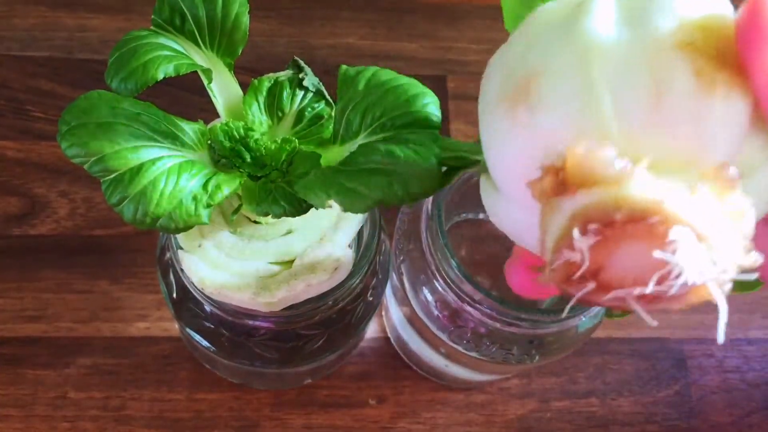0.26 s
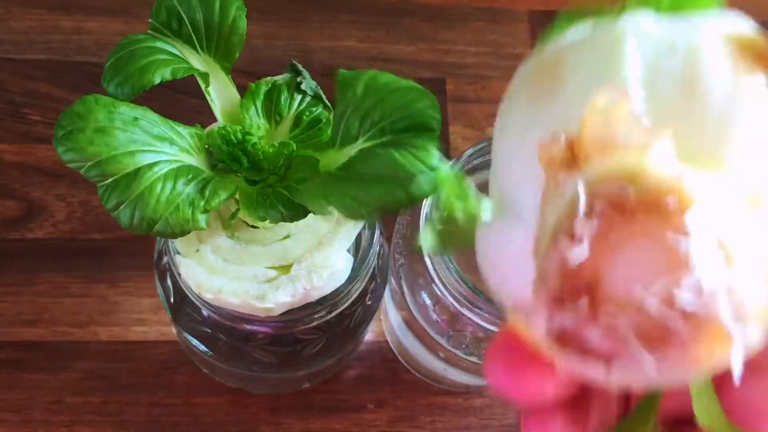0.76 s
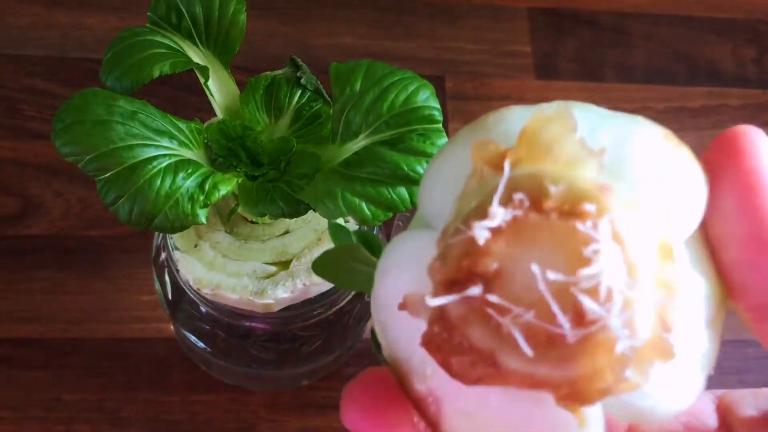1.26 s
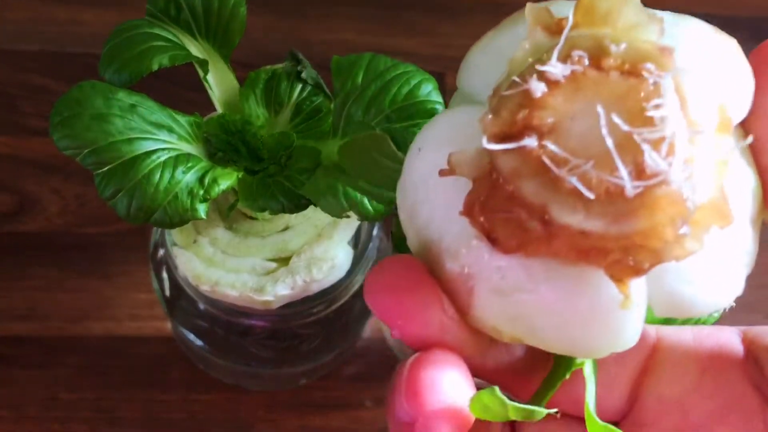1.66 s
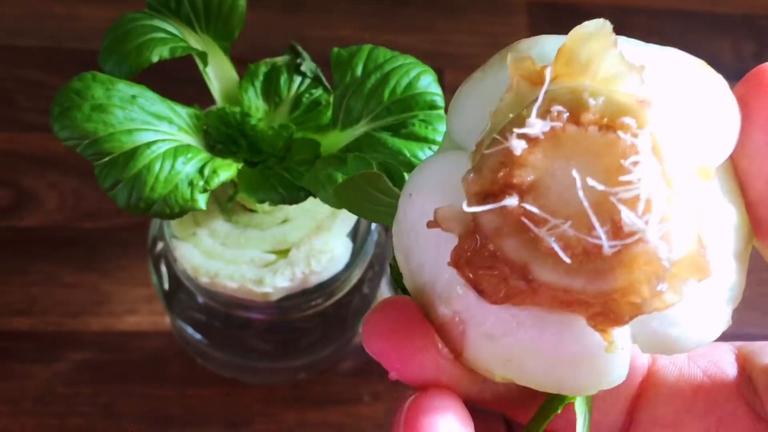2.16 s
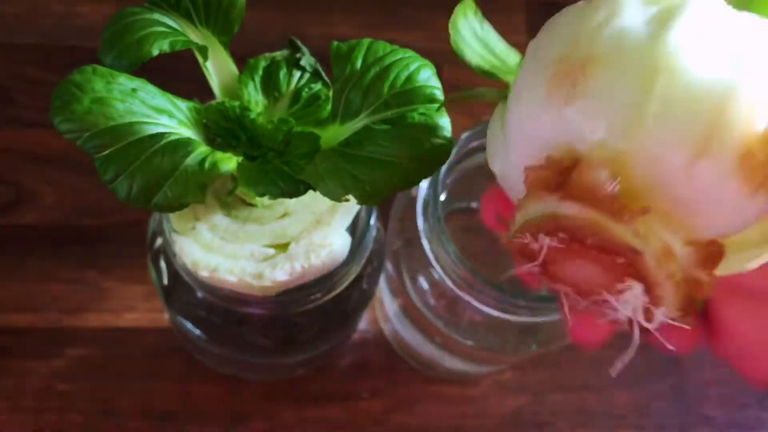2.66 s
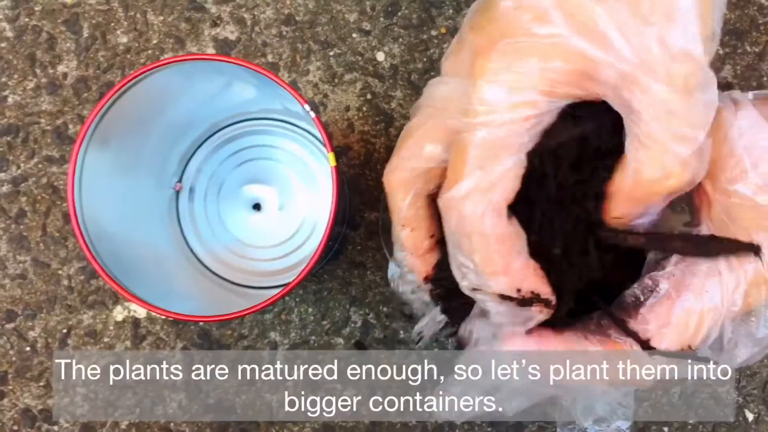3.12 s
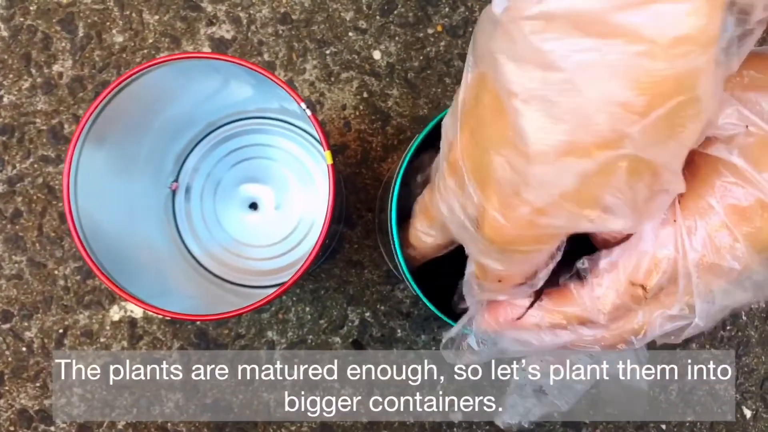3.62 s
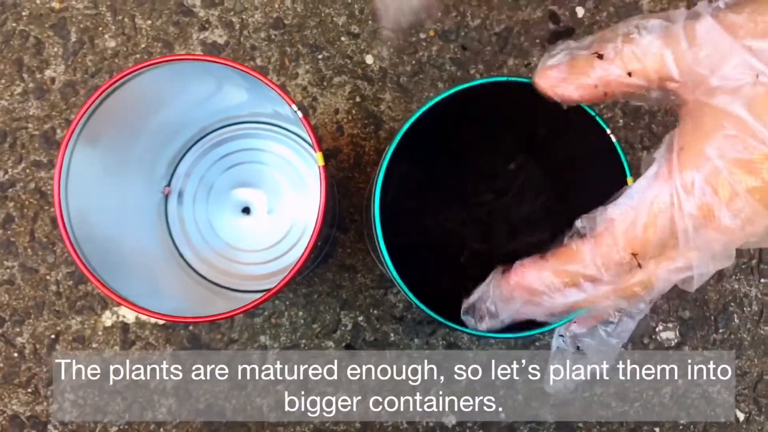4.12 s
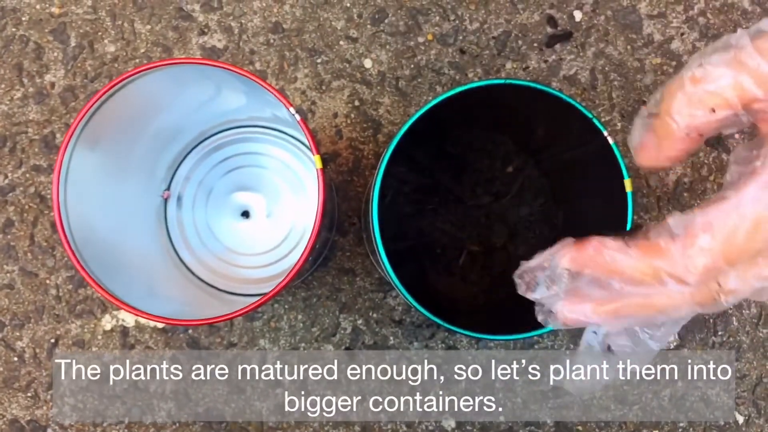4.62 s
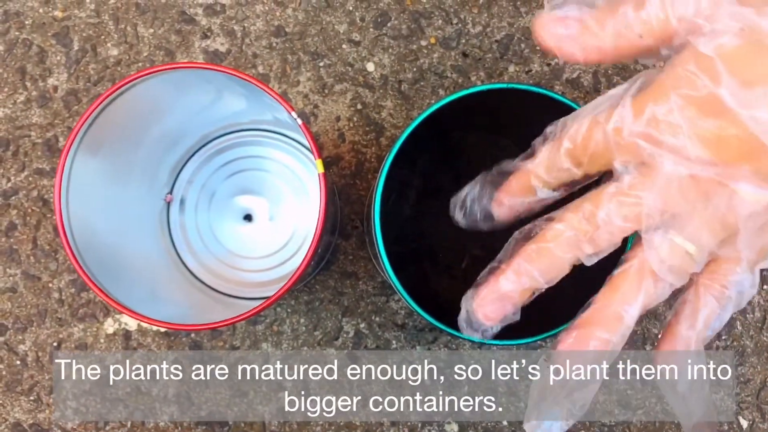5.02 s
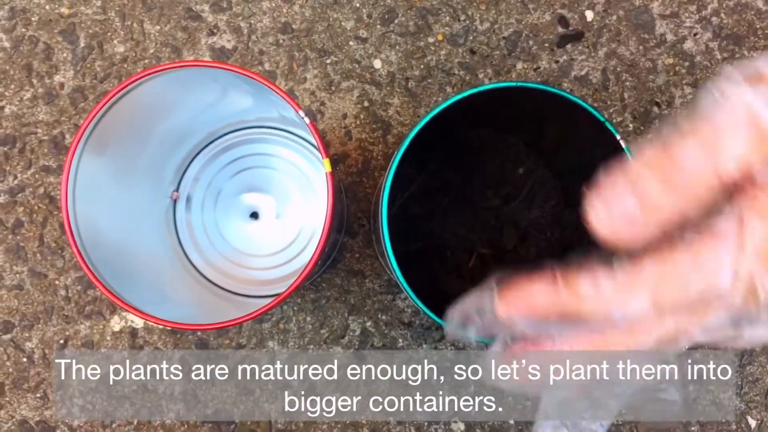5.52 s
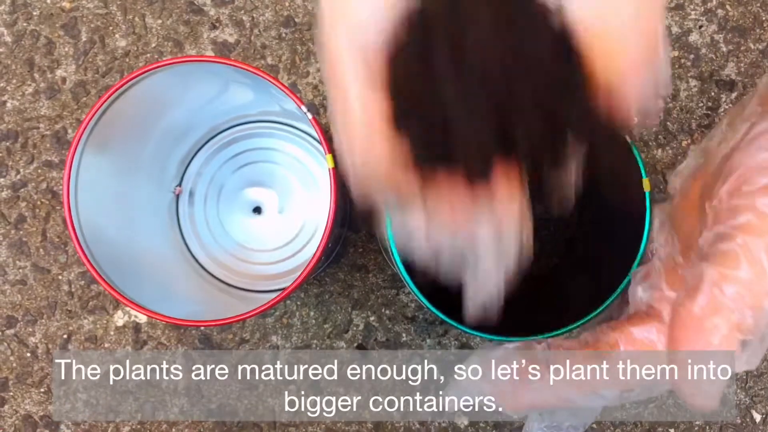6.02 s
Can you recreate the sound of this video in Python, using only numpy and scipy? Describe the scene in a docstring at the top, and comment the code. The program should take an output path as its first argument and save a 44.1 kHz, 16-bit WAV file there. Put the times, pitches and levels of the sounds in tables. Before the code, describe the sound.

A very quiet room with faint hiss and low wavering hum; small wet leaf crackles come in three clusters, then near silence and a faint knock. Abruptly outdoors, soil drops into a metal tin with a loud, quickly choked clang. Close thin plastic gloves crinkle and snap while fingers rake and pat the soil over distant traffic rumble. Near the end small hard scraps chink brightly.

```python
"""A quiet room comes first, with filtered-noise hiss and a wavering sine hum; a vegetable is turned by hand,
and its wet leaves crackle as noise bursts that excite rib resonances, until a faint low knock made likewise.
Then, outdoors on stone, filtered noise gives far traffic, and a handful of soil drops into a tin: decaying
modes ring until the soil damps them. Thin gloves crinkle and snap as bursts of noise, and fingers rake the soil
(grains in moving bands) and pat it (short falling modes). Near the end two hard scraps chink: high modes."""
import sys
import numpy as np
from scipy import signal
from scipy.fft import rfft, irfft
from scipy.io import wavfile
from scipy.ndimage import uniform_filter1d

SR = 44100
rng = np.random.default_rng(int(sys.argv[2]) if len(sys.argv) > 2 else 0)


def ratio(d):
    """dB to gain"""
    e = np.asarray(d, float) / 20
    return 10 ** e


def int16_out(signal):
    """Quantize to a 16-bit WAV file."""
    q = np.round(np.clip(np.atleast_2d(signal).T, -1, 1) * 32767)
    wavfile.write(sys.argv[1], SR, q.astype(np.int16))


N = 276948
T = np.arange(N) / SR  # time [s]

# Spectra of the room hiss and the yard rumble, relative: f/Hz, level/dB
ROOM_SPECTRUM = [(15, -36), (25, -5), (80, -8), (99, -8.5), (249, -19), (285, -18), (545, -28), (624, -24),
                 (840, -26), (1040, -24), (1290, -27), (6560, -35.5), (16000, -41)]
YARD_SPECTRUM = [(25, -13), (60, 2), (170, -2.5), (320, -21.5), (700, -25.5), (1500, -30.5), (4000, -66),
                 (9000, -30.5), (16000, -66.5)]
# Hum and the rush of a far vehicle in the room: t/s, hum f/Hz, hum level/dB, rush level/dB
HUM_COURSE = [(0.0, 80.2, -78.5, -93), (0.11, 68.7, -94, -88), (0.34, 70.3, -57.5, -91),
              (0.48, 67.9, -92, -97), (0.94, 75.4, -69, -77), (1.82, 78.2, -71, -93),
              (1.9, 76.4, -61.5, -78.5), (2.57, 77.3, -57, -67.5), (2.8, 75, -82, -70)]
# Leaf crackles, and last a faint low knock: t/s, peak level/dB, centre f/Hz, decay t60/s
CRACKLES_AND_KNOCK = [(0.24, -50, 3330, 0.047), (0.257, -50, 1960, 0.05), (0.278, -40, 2440, 0.041),
                      (0.31, -48, 2660, .033), (0.324, -39, 2400, 0.064), (0.329, -40.5, 3620, 0.049),
                      (0.347, -38.5, 3360, 0.028), (0.49, -56.5, 2760, 0.015), (0.554, -34.5, 1640, 0.063),
                      (0.572, -36.5, 2700, .023), (0.579, -34, 2620, 0.021), (0.591, -42, 1390, 0.023),
                      (0.727, -57, 2920, .024), (0.819, -35, 2640, 0.01), (0.834, -33, 1810, 0.05),
                      (0.861, -31, 2700, 0.027), (0.868, -36, 1500, .03), (1.169, -57, 2950, 0.017),
                      (2.729, -52.5, 582, 0.036)]
# Resonances of the stiff leaf ribs: f/Hz, nominal width/Hz, level/dB
LEAF_RIBS = [(1270, 200, -1), (1750, 250, -1), (2440, 220, 1), (3400, 250, -2), (3900, 300, -2),
             (4480, 250, -2), (6300, 600, -6)]
# Chinks on the stone: t/s, peak level/dB, index of the scrap
SCRAP_CHINKS = [(5.927, -38.5, 0), (5.9947, -30, 1), (6.046, -38, 1), (6.106, -43, 0)]
# Modes of the two small hard scraps, one list each: f/Hz, level/dB, t60/s
SCRAP_MODES = ([(4823, 0, .087), (5626, -3, .15), (6659, -6, .12), (6988, -12, .12), (8096, -2, .068),
               (12970, -12, .061), (13400, -8, .056)], [(2900, -16, .06), (3343, -10, .1), (3887, -5, .09),
               (4300, -10, .07), (5626, -12, .1), (4683, -1, .05), (6900, -6, .1), (8091, -4, .068),
               (8678, -4, .12), (9437, -14, .15), (9981, -13, .15), (11220, -14, .12), (12200, 0, .036),
               (14320, -9, .05), (15340, -4, .08)])
# Glove snaps: t/s, peak level/dB, centre f/Hz, decay t60/s
GLOVE_SNAPS = [(3.2297, -26, 3530, 0.012), (3.2585, -30.5, 4600, 0.016), (3.2902, -23, 4650, 0.018),
               (3.3592, -12, 8800, 0.025), (3.4416, -23.5, 6550, 0.023), (3.514, -25, 9090, 0.016),
               (3.5365, -29, 3360, 0.025), (3.566, -28.5, 5860, 0.016), (3.6296, -18, 4620, 0.038),
               (3.683, -28, 6490, 0.015), (3.7508, -24, 5760, 0.02), (3.803, -29.5, 5730, 0.015),
               (3.995, -32, 6500, 0.017), (4.1452, -32.5, 5800, 0.015), (4.232, -36, 9390, 0.012),
               (4.2467, -34, 6680, 0.015), (4.2874, -38.5, 8550, 0.021), (4.5987, -35, 6900, 0.011),
               (4.7752, -27.5, 8290, 0.013), (4.8281, -31.5, 5700, 0.018), (4.8556, -21, 8700, 0.0076),
               (4.9514, -30, 4000, 0.016), (4.999, -33, 5800, 0.016), (5.186, -23.5, 6860, 0.017),
               (5.2317, -24.5, 8700, 0.016), (5.308, -30.5, 6840, 0.013), (5.44, -30, 4170, 0.016),
               (5.4768, -39, 6050, 0.016), (5.54, -36, 4480, 0.021), (5.558, -30, 8560, 0.014),
               (5.5909, -36, 8600, 0.013), (5.6373, -43, 6330, 0.016), (5.6546, -29.5, 8350, 0.015),
               (5.7141, -31, 9300, 0.016), (5.8797, -38, 8820, 0.02), (5.926, -55.5, 4870, 0.016),
               (5.9948, -33, 8500, 0.016), (6.187, -56.5, 12900, 0.016), (6.203, -38, 9250, 0.015),
               (6.2584, -28, 13200, 0.016)]
# Hands at work: t/s, glove crinkle level/dB, soil rustle level/dB
HAND_LEVELS = [(2.94, -47, -39), (2.99, -47.5, -38.5), (3.09, -47.5, -53.5), (3.12, -50, -38.5),
               (3.25, -41.5, -48.5), (3.38, -43, -46.5), (3.6, -46.5, -55.5), (3.72, -43.5, -50),
               (3.88, -45, -54.5), (3.94, -50, -51.5), (4.08, -47.5, -58), (4.15, -55, -72),
               (4.32, -60, -75), (4.37, -51, -62.5), (4.56, -59.5, -70.5), (4.62, -57, -57.5),
               (4.7, -52, -54.5), (4.78, -50, -54.5), (4.88, -44.5, -53), (5.08, -52.5, -53.5),
               (5.19, -44.5, -51.5), (5.33, -49.5, -64), (5.38, -44, -54), (5.5, -55.5, -57),
               (5.62, -58, -63.5), (5.72, -47.5, -60), (5.82, -62.5, -66), (5.96, -56.5, -71),
               (6.1, -58.5, -77), (6.28, -50, -48)]
# Spectra of glove film and raked soil, relative: f/Hz, level/dB
GLOVE_SPECTRUM = [(900, -40), (1600, 3.5), (3000, 2), (4500, 5), (7000, 2), (9500, 0), (13000, -0.5),
                  (16000, -1)]
SOIL_SPECTRUM = [(500, -25), (900, -6), (1400, -1), (2200, -2), (3600, -6), (5200, -14), (8000, -30)]
# Pitch centre about which the rustle drifts: t/s, f/Hz
RAKE_PITCH = [(2.94, 2000), (4.5, 2200), (4.57, 1250), (4.76, 1900), (6.28, 2200)]
# Finger pats: t/s, peak level/dB, pitch as a multiple of the usual
FINGER_PATS = [(3.422, -29, 1.18), (3.715, -17, 1.086), (3.9034, -20.5, .95)]
# Modes of the filled tin at the onset of a pat of usual pitch: f/Hz, level/dB, t60/s
FILLED_TIN_MODES = [(397, -10.5, 0.019), (575, -12, 0.067), (1134, 5, 0.012), (1500, 3.5, .014),
                    (1990, 0, 0.0098), (2400, -14, 0.019)]
# Mode frequencies of the tin: f/Hz
TIN_MODE_HZ = [340, 400, 480, 603, 760, 935, 986, 1038, 1125, 1205, 1255, 1480, 1640, 1865, 1985, 2128,
               2264, 2338, 2451, 2643, 2937, 3354, 3492, 4150, 4343, 4890, 5110, 6100, 7050, 8280]
# Response of each of those modes: level/dB, t60/s when empty
TIN_MODES = [(5, 0.16), (-3, 0.22), (-3.5, 0.04), (-8, 0.22), (0.5, 0.023), (-21.5, 0.25), (0, 0.039),
             (-10, 0.14), (-17, 0.34), (-12.5, 0.17), (-7.5, 0.05), (-20, 0.024), (-13, 0.048),
             (3.5, 0.093), (-9, 0.064), (-26, 0.36), (-34.5, 0.17), (1.5, 0.12), (-4.5, 0.056), (-41, 0.48),
             (-6.5, 0.071), (-8, 0.22), (-14, 0.176), (-0.5, 0.034), (-8, 0.13), (-6.5, 0.14), (-3, 0.07),
             (-8, 0.079), (-3, 0.018), (-6, 0.069)]
# Choking of the tin by soil and hands: t/s, damping as a multiple of the empty tin's
TIN_CHOKE = [(2.8, 1.1), (2.89, 1.2), (2.925, 1.8), (2.94, 5), (3.1, 5), (3.125, 1.7), (3.22, 1.7),
             (3.3, 6), (6.28, 9)]
# Blows on the tin: t/s, peak level/dB of the ring, centre f/Hz of the modes reached, spread/octaves,
# level/dB of the grit hiss against the ring
TIN_BLOWS = [(2.814, -10.5, 1790, 1.14, -16), (2.82, -15, 2100, 1.3, -8), (2.824, -3.5, 2020, 1.18, -15),
             (2.838, -28.5, 2000, 1.2, -5), (2.853, -16.5, 1940, 1.46, -19), (2.8932, -13, 1876, 1.47, -16),
             (2.908, -2, 2190, 0.58, -14.5), (2.91, -17, 328, 0.33, -20.5), (2.912, -4.5, 2450, 0.58, -45),
             (2.925, -10, 2420, 1.8, -10), (2.927, -17, 360, 0.98, -27), (2.991, -17.5, 2440, 1.05, -7.5),
             (3.041, -27.5, 3650, 0.62, -18), (3.07, -41, 3520, .2, -25), (3.122, -33, 1125, .035, -20),
             (3.128, -27, 2400, 0.62, -7), (3.136, -24.5, 336, 1.6, -8), (3.165, -34, 1125, .035, -23),
             (3.145, -32, 2400, 0.68, -4.5), (3.267, -39, 345, 1.3, -2.5), (3.307, -32, 1890, 0.54, -9.5),
             (3.519, -40.5, 1270, 0.085, -20), (4.008, -35, 310, 1.8, -17), (4.071, -39, 1100, 0.39, -19),
             (4.576, -44, 1280, 0.11, -25.5), (4.997, -44.5, 302.6, 0.76, -5.5),
             (5.32, -42.5, 342, 1.8, -5), (5.36, -38.5, 2110, 0.58, 1.5), (5.946, -43.5, 371, 0.98, -12)]
# Microphone response: f/Hz, level/dB
MIC_RESPONSE = [(20, -30), (45, -1), (100, 0), (4300, 0), (4800, -3), (5400, 0), (9600, 0), (10350, -6),
                (11300, -1), (15000, 0)]


def curve(rows):
    """Linear interpolation: turns the columns of a timed table into signals."""
    s, *columns = np.transpose(rows)
    return [np.interp(T, s, c) for c in columns]


def colour(x, points):
    """Linear filtering: weights the spectrum by (f/Hz, level/dB) points and restores rms 1."""
    hz, db = np.transpose(points)
    f = np.arange(N // 2 + 1) * SR / N + 1
    gain = ratio(np.interp(np.log(f), np.log(hz), db))
    y = irfft(rfft(x) * gain, N)
    return y / y.std()


def band(x, hz, octaves):
    """Resonant selection: passes a band around a centre frequency."""
    low, high = hz * 2 ** (-octaves / 2), hz * 2 ** (octaves / 2)
    edges = low, min(high, SR / 2.2)
    return signal.sosfilt(signal.butter(2, edges, "band", fs=SR, output="sos"), x)


def walk(rate):
    """Random modulation: levels held for 1 / rate seconds and smoothed twice."""
    k = int(SR / rate)
    steps = np.repeat(rng.standard_normal(N // k + 1), k)
    return 3.3 * uniform_filter1d(uniform_filter1d(steps, k), k)[:N]


def add(out, s, sound):
    """Superposition: adds a sound at a given time."""
    i = int(s * SR)
    out[i:i + len(sound)] += sound[:N - i]


def decay(t, t60):
    """Exponential damping: amplitude falls by 60 dB in t60."""
    return np.exp(-np.log(1000) * t / t60)


def modes(rows, t, phase_s):
    """Modal superposition: damped sines of (f/Hz, level/dB, t60/s), whose phase runs on its own clock."""
    return sum(ratio(db) * decay(t, t60) * np.sin(2 * np.pi * hz * phase_s) for hz, db, t60 in rows)


def grains(rate, spread_db, tail_s, bunch_db, bed):
    """Granular noise: bunched impacts of very unequal size, over a bed of countless tiny ones."""
    sizes = ratio(spread_db * np.minimum(rng.exponential(size=N), 5))
    clicks = (rng.random(N) < rate / SR) * sizes
    burst = signal.lfilter([1], [1, -np.exp(-1 / (tail_s * SR))], clicks)
    return rng.standard_normal(N) * (burst / burst.mean() + bed) * ratio(bunch_db * walk(30))


def room():
    """Stationary noise and frequency modulation: even hiss, a wavering hum and a far rush that swells."""
    hum_hz, hum_db, rush_db = curve(HUM_COURSE)
    phase = 2 * np.pi * np.cumsum(hum_hz + 2.32 * walk(4.6)) / SR
    hum = np.sqrt(2) * np.sin(phase) * ratio(hum_db + 0.47 * walk(12))
    rush = band(rng.standard_normal(N), 590, 2.17)
    hiss = ratio(-65) * colour(rng.standard_normal(N), ROOM_SPECTRUM)
    return hiss + hum + rush / rush.std() * ratio(rush_db)


def yard():
    """Amplitude-modulated noise: distant traffic rumble that rolls up and down a little."""
    roll = ratio(1.1 * walk(4))
    return ratio(-52) * roll * colour(rng.standard_normal(N), YARD_SPECTRUM)


def leaves_and_knock():
    """Forced resonance: noise bursts ring resonances near their pitch; the harder, the broader."""
    out, t = np.zeros(N), T[:4096]
    # the resonances are never quite alike from one burst to the next
    bends = 2 ** (0.07 * rng.standard_normal((len(CRACKLES_AND_KNOCK), len(LEAF_RIBS))))
    noises = rng.standard_normal((len(CRACKLES_AND_KNOCK), 4096))
    for (s, peak_db, centre_hz, t60), noise, bend in zip(CRACKLES_AND_KNOCK, noises, bends):
        burst = noise * decay(t, max(t60, 0.002)) * (1 - np.exp(-t / 0.001)) ** 2
        ribs = 0
        for (hz, width, db), b in zip(LEAF_RIBS, bend):
            gain = ratio(db - 5 * np.log2(hz / centre_hz) ** 2) / np.sqrt(width)
            ribs = ribs + gain * band(burst, hz * b, width / hz * 1.8)
        broad = band(burst, 2000, 4.83)
        broad_gain = ratio(0.73 * (max(peak_db, -44) + 37.5))
        sound = ribs / ribs.std() + broad_gain * broad / broad.std()
        add(out, s, ratio(peak_db) * sound / np.abs(sound).max())
    return out


def chinks():
    """Free vibration: a sharp strike sets off the thin high modes of a hard scrap."""
    out, t = np.zeros(N), T[:6000]
    for s, peak_db, which in SCRAP_CHINKS:
        ring = modes(SCRAP_MODES[int(round(which))], t, t)
        add(out, s, ratio(peak_db) * ring / np.abs(ring).max())
    return out


def snaps():
    """Transient noise: each glove snap rises and decays quickly, with a favoured pitch region."""
    out, t = np.zeros(N), T[:4096]
    noises = rng.standard_normal((len(GLOVE_SNAPS), 4096))
    for (s, peak_db, hz, t60), noise in zip(GLOVE_SNAPS, noises):
        burst = noise * decay(t, max(t60, 0.002)) * (1 - np.exp(-t / 0.00023)) ** 2
        sound = band(burst, hz, 1.5)
        broad = band(burst, 6500, 6.37)
        sound = sound / sound.std() + ratio(-3.5) * broad / burst.std()
        add(out, s, ratio(peak_db) * sound / np.abs(sound).max())
    return out


def echoes(near):
    """Diffuse reflection: convolution with decaying noise gives quick echoes from nearby surfaces."""
    echo = rng.standard_normal(6000) * decay(T[:6000], 0.21)
    return ratio(-12) * signal.fftconvolve(near, echo / np.linalg.norm(echo))[:N]


def film(crinkle_db):
    """Buckling: creases pop in bunches, each with its own pitch region; busy hands blur them into a bed."""
    bunch_db = 1.3 * walk(45)
    sizes = ratio(0.85 * np.minimum(rng.exponential(size=N), 3.5) + bunch_db)
    pops = (rng.random(N) < 400 / SR) * sizes  # 400 pops per second on average
    out = 0
    for hz in 2000 * 2 ** np.arange(0, 3.2, 0.6):
        strengths = ratio(5 * rng.standard_normal(N))
        burst = signal.lfilter([1], [1, -np.exp(-1 / (0.0007 * SR))], pops * strengths)
        bed = 1.2 * ratio(0.5 * (crinkle_db + 48) + bunch_db + 1.5 * walk(25))
        noise = rng.standard_normal(N) * (burst / burst.mean() + bed)
        out = out + np.sqrt(hz) * band(noise, hz, 0.6)
    return out


def gloves(crinkle_db):
    """Tension and brightness: the crinkle's top octave is louder when the film is drawn tight."""
    sound = colour(film(crinkle_db), GLOVE_SPECTRUM)
    top = signal.sosfiltfilt(signal.butter(3, 10000, "high", fs=SR, output="sos"), sound)
    body = sound - top
    # the top gains 0.46 dB on the body per dB of crinkle
    bright_db = -2.5 + 0.46 * (crinkle_db + 53) + 1.1 * walk(2.2)
    return ratio(crinkle_db) * (body / body.std() + ratio(bright_db) * top / top.std())


def raked_soil(soil_db):
    """Granular friction: a rustle of grains is weighted, band by band, around a drifting pitch."""
    rake_hz = curve(RAKE_PITCH)[0] * 2 ** (0.074 * walk(3.9))
    rustle = colour(grains(2100, 2.9, 0.00075, 0.24, 0.79), SOIL_SPECTRUM)
    soil = 0
    for k, hz in enumerate(600 * 2 ** (np.arange(10) / 2.5)):
        fall_db = -7 * np.minimum(np.log2(hz / rake_hz) ** 2 / 1.5, 1.6)
        # neighbouring bands alternate in sign
        soil = soil + (-1) ** k * band(rustle, hz, 0.4) * ratio(fall_db + 0.8 * walk(14))
    return soil / soil.std() * ratio(soil_db)


def crumbs(soil_db):
    """Impact excitation: loose crumbs rattle the tin's hollow and faintly ring its half-choked wall."""
    patter = grains(180, 4.0, 0.013, 0.94, 0.16)
    hollow = band(patter, 428, 1.25)
    # the wall fades 1.3 times as fast as when empty
    wall_modes = [(hz, db, t60 / 1.3) for hz, (db, t60) in zip(TIN_MODE_HZ, TIN_MODES)]
    ring = signal.fftconvolve(patter, modes(wall_modes, T[:6000], T[:6000]))[:N]
    patter = hollow / hollow.std() + ratio(-2.0) * ring / ring.std()
    # level against the rustle: first while soil pours, then after it has settled
    land = ratio(soil_db + np.interp(T, [4.5, 4.5 + 0.091], [-7, -18.5]))
    for s, db, _ in FINGER_PATS:  # each pat shakes more crumbs loose
        land = land + (T > s) * ratio(db - 30) * decay(np.abs(T - s), 0.39)
    return patter * land


def pats():
    """Heavily damped modes: the filled tin answers dull and short, sagging in pitch as the soil settles."""
    out, t = np.zeros(N), T[:3000]
    sag = t - 6.4 * t ** 2 / 2  # frequency falls by 6.4 times its onset value per second
    grits = rng.standard_normal((len(FINGER_PATS), 300))
    for (s, peak_db, pitch), grit in zip(FINGER_PATS, grits):
        ring = modes(FILLED_TIN_MODES, t, pitch * sag)
        push = 0.04 * grit * np.exp(-t[:300] / 0.0048) + (t[:300] == 0)
        ring = signal.fftconvolve(ring, push)[:len(t)] * (1 - np.exp(-t / 0.0018))
        add(out, s, ratio(peak_db) * ring / np.abs(ring).max())
    return out


def hands():
    """Superposition of contact sounds: glove crinkle, raked soil, falling crumbs and pats."""
    crinkle_db, soil_db = curve(HAND_LEVELS)
    return gloves(crinkle_db) + raked_soil(soil_db) + crumbs(soil_db) + pats()


def tin():
    """Modal damping: each blow starts modes near its centre, which fade faster as soil chokes the wall."""
    out = np.zeros(N)
    clock = np.cumsum(np.maximum(curve(TIN_CHOKE)[0], 0.3)) / SR  # runs at the rate of damping
    hz = np.array(TIN_MODE_HZ)[:, None]
    db, t60 = np.transpose(TIN_MODES)[:, :, None]
    places = rng.standard_normal((len(TIN_BLOWS), len(TIN_MODES)))
    grits = rng.standard_normal((len(TIN_BLOWS), 12000))
    for (s, peak_db, centre_hz, spread, grit_db), place, grit in zip(TIN_BLOWS, places, grits):
        i = int(s * SR)
        age = clock[i:i + 12000] - clock[i]
        t, grit = T[:len(age)], grit[:len(age)]
        # the place of the blow favours some modes at random
        distance = np.log2(hz / centre_hz) / max(spread, 1 / 50)
        gain = ratio(db - 4.37 * distance ** 2 + 1.5 * place[:, None])
        # the low notes live in the hollow and feel the choke less
        worn = t + (age - t) * np.clip(hz / 550, 0, 1)
        ring = np.sum(gain * decay(worn, t60) * np.sin(2 * np.pi * hz * t), axis=0)
        # crumbs follow the first contact and keep pushing the wall for a few milliseconds
        push = 0.035 * grit[:600] * np.exp(-t[:600] / 0.003) + (t[:600] == 0)
        ring = signal.fftconvolve(ring, push)[:len(t)] * (1 - np.exp(-t / 0.0012))
        hiss = band(grit, 5000, 3.04) * decay(age, 0.47) * (1 - np.exp(-t / 0.0011)) / 3
        add(out, s, ratio(peak_db) * (ring / np.abs(ring).max() + ratio(grit_db) * hiss))
    return signal.sosfilt(signal.butter(4, 250, "high", fs=SR, output="sos"), out)


def scene():
    """Linear superposition: the room gives way to the yard, and near sounds gain their reflections."""
    outside = np.clip((T - 2.803) / 0.0039, 0, 1)  # crossfade from 2.803 s, lasting 3.9 ms
    near = chinks() + snaps() + leaves_and_knock()
    near = near + echoes(near)
    inside_sound = (1 - outside) * room()
    outside_sound = outside * (yard() + hands())
    return (near + tin() + inside_sound + outside_sound)[None]


def low_pass(x):
    """Removes everything above the highest recorded frequency."""
    return signal.sosfilt(signal.butter(12, 16810, fs=SR, output="sos"), x)


def record(dry):
    """Transducer response: a small microphone with two dips in the treble and a cut top."""
    sound = colour(dry[0], MIC_RESPONSE) * dry.std()
    sound = signal.sosfilt(signal.ellip(8, 0.2, 60, 15800, fs=SR, output="sos"), sound)
    return low_pass(sound[None])


dry = scene()
out = record(dry)
int16_out(out)
```